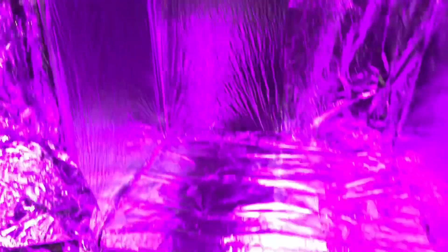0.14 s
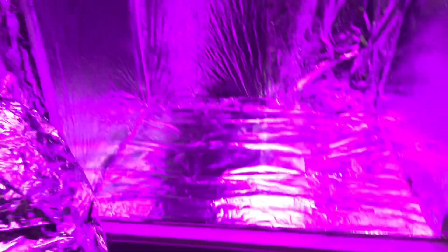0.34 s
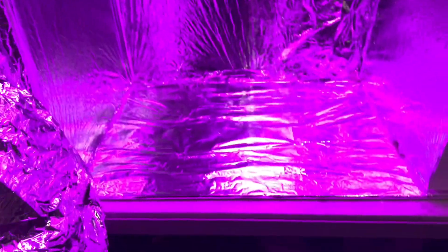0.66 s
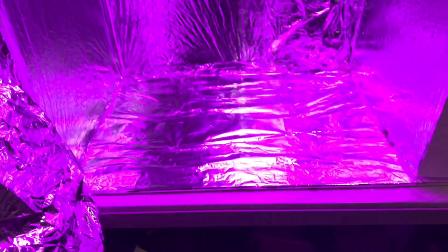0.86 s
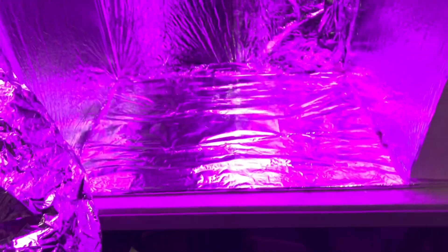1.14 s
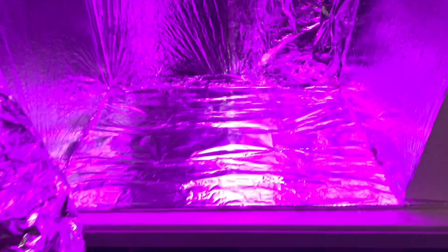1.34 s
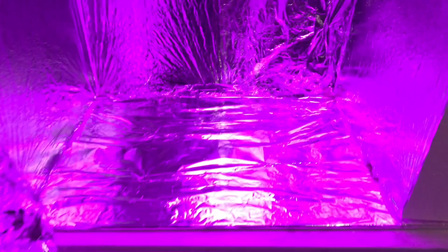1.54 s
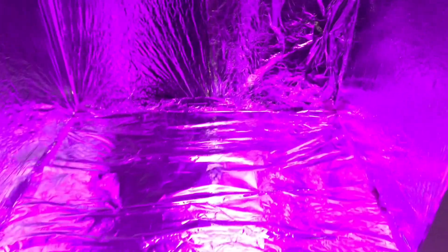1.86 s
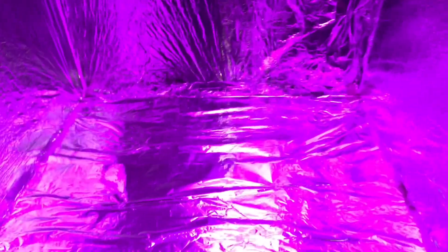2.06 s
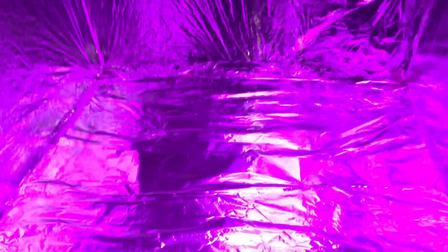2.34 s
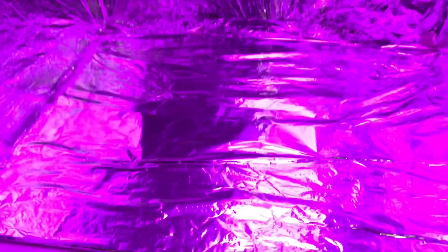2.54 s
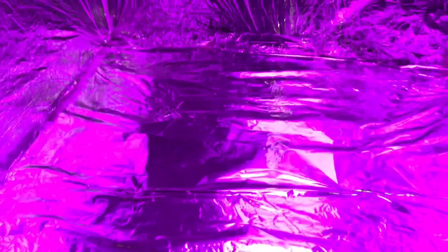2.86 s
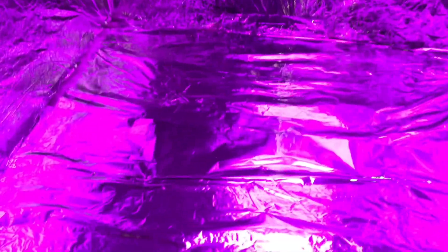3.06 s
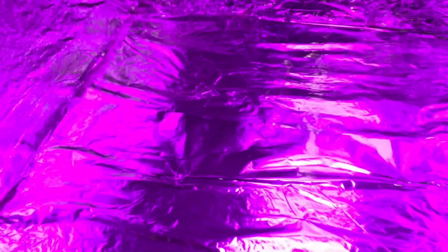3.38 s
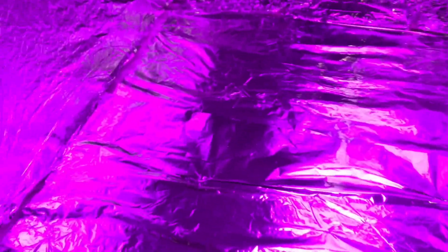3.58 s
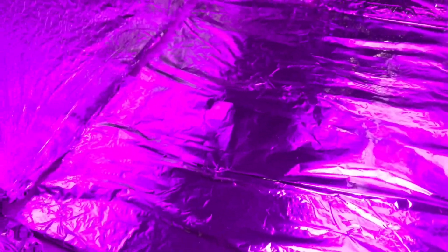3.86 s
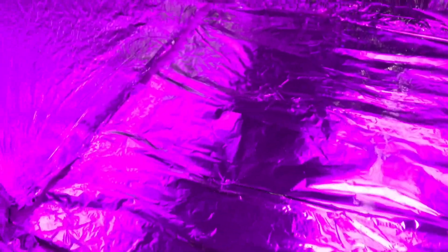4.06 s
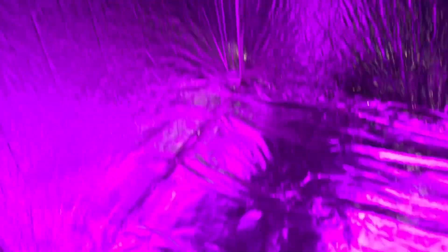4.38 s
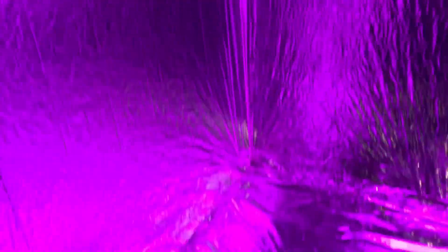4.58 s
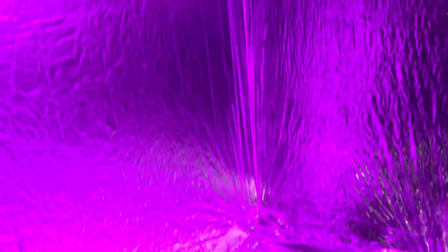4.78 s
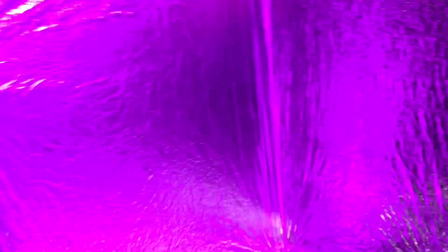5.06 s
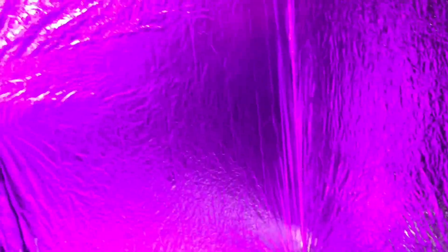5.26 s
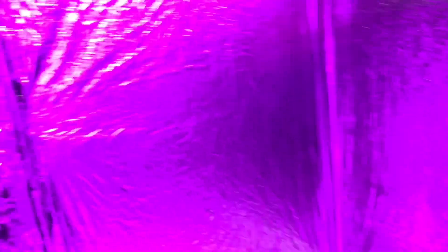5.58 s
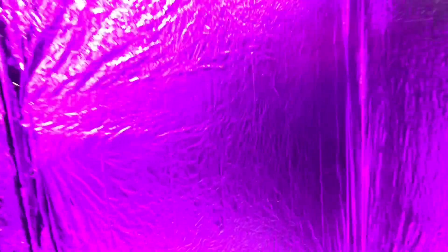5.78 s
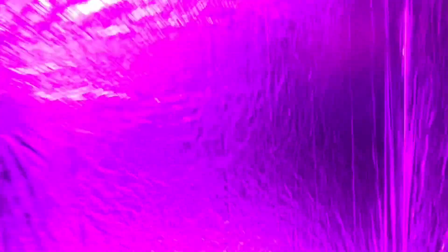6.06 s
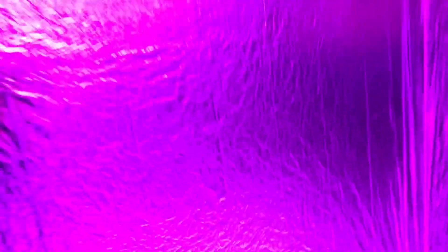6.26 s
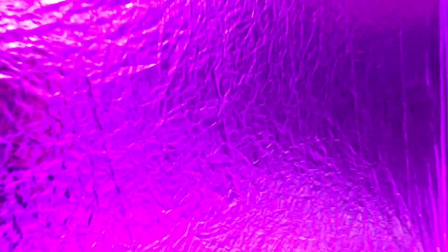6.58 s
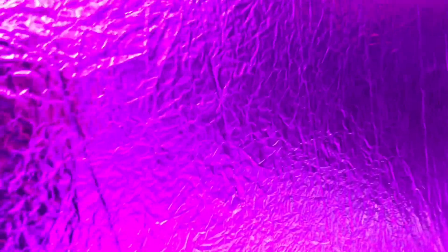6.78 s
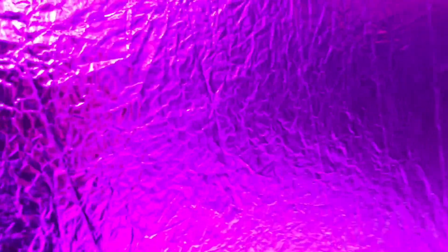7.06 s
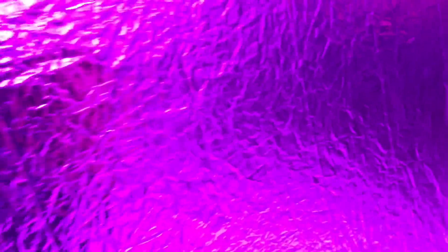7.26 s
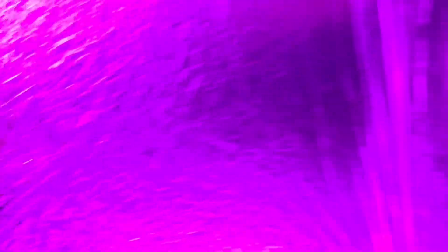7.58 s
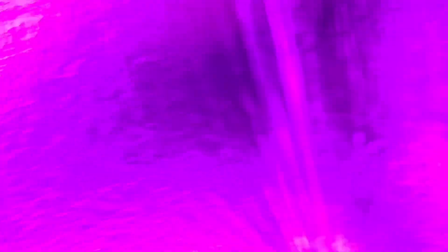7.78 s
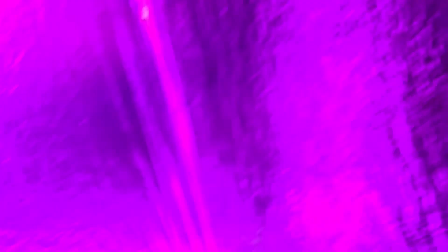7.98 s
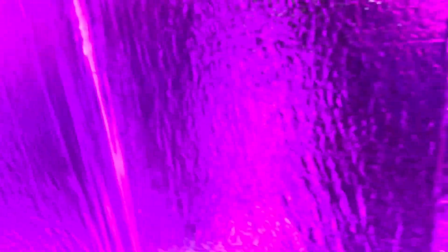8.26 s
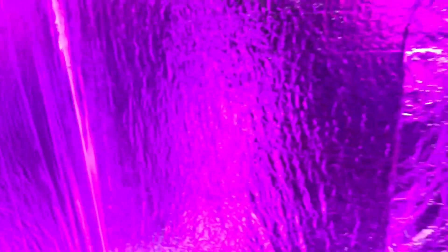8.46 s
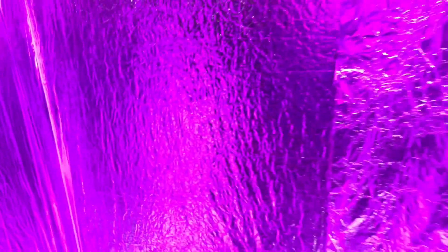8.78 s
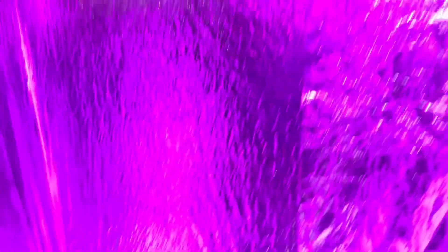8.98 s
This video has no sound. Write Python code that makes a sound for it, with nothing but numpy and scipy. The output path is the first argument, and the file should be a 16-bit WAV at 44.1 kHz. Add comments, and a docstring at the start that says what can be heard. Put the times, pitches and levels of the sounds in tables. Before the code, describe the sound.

Very close to the microphone, thin foil is pulled along the wall of a small box: dense, bright, uneven crackling with sharp snaps, strongest at the start and weakening until about three and a half seconds. Afterwards come isolated clicks, short scuffs and dull soft bumps, with quiet gaps of room air, a low fan hum and a thin electrical whine.

```python
"""Foil lining sliding in a small box

Close up, thin foil is pulled along the wall of a small box, then nudged now and again.
Uneven random clicks make the crinkle, short noise bursts the snaps, and resonated clicks the scuffs.
Short, changing echoes and panel resonances put the foil in the box; filtered noise makes handling rumble.
Beneath lie room air in coloured noise, a faint wavering fan tone and an electrical whine."""
import sys
import numpy as np
from scipy import signal
from scipy.fft import rfft, irfft
from scipy.io import wavfile
from scipy.ndimage import uniform_filter1d

SR = 44100
rng = np.random.default_rng(int(sys.argv[2]) if len(sys.argv) > 2 else 0)


def generate_wav(signal):
    """Clip the signal to [-1, 1] and save it as 16-bit WAV at the path in sys.argv[1]."""
    frames = np.transpose(np.atleast_2d(signal))
    scaled = np.clip(frames, -1, 1) * 32767
    pcm = np.round(scaled).astype(np.int16)
    wavfile.write(sys.argv[1], SR, pcm)


N = 402633
T = np.arange(N) / SR

# effort of the long pull, before the crinkle gain: t/s, level/dB
PULL_EFFORT = [(0.0, -38), (0.08, -38), (0.26, -43), (0.49, -40.5), (0.6, -46.5), (0.66, -43.5),
               (0.79, -51), (0.96, -53), (0.98, -46), (1.34, -42), (1.35, -44), (1.94, -47), (2.03, -54.5),
               (2.06, -48), (2.23, -49), (2.38, -44.5), (2.56, -52.0), (2.6, -50), (2.76, -51), (2.8, -55),
               (3.02, -49.5), (3.08, -59.5), (3.13, -56.2), (3.36, -61.5)]
# hand shaking the box, before the closing fade: t/s, level/dB
HAND_SHAKE = [(0.0, -73), (0.06, -50), (0.93, -68), (2.37, -69), (2.42, -59), (2.6, -72), (2.95, -66),
              (3.37, -81), (3.4, -65), (4.2, -81)]
# single large creases that snap: t/s, level/dB (loudest 5 ms, before the box), tilt/(dB per octave)
LARGE_SNAPS = [ (0.563, -37.5, 3), (0.634, -30, 4.5), (.7138, -38, 3), (.789, -34.5, .5), (.98, -30, 1.5),
               (1.084, -39.5, -0.5), (1.236, -36, 3), (1.5182, -37.5, -1), (1.8763, -45, 5),
               (2.0414, -41.5, 1.5), (2.6406, -41.5, 0), (2.68, -43, .5), (3.368, -45, -0.5),
               (3.4097, -42.5, -5.5), (3.4637, -40, -0.5), (3.5597, -38.5, -2.5), (3.819, -32, 0),
               (3.8765, -46, 3.5), (3.897, -52, 1), (3.9382, -48, -1.5), (3.96, -53, -4),
               (3.9758, -48.5, 0), (3.9905, -46, -1.5), (4.0577, -48.5, .5), (4.068, -53.5, -1.5),
               (4.3202, -55, 1), (4.707, -59.5, 4), (4.8625, -55.5, 1), (4.95, -52, 1), (5.218, -43, 0),
               (5.247, -46, 1.5), (5.286, -50, -1.5), (6.0135, -49, -1), (6.0256, -46, -1),
               (6.2205, -51, -1.5), (6.843, -48.5, -1), (7.17, -59.5, -4.5), (7.2666, -52.5, 1),
               (7.371, -58.5, -3), (7.437, -55, -0.5), (7.4848, -38.5, 0), (7.772, -58.5, -2),
               (8.1115, -42.5, 2.5), (8.358, -55, -0.5)]
# foil scuffing the wall: peak t/s, rise/s, panel level/dB, panel f/Hz, foil level/dB, foil top f/Hz
WALL_SCUFFS = [ (2.408, 0.024, -53, 1290, -34.5, 16000), (2.462, 0.045, -53, 1290, -40, 15000),
               (2.796, 0.0038, -36, 1170, -55, 9000), (2.824, 0.026, -35, 1610, -44, 12000),
               (2.875, .04, -42, 583, -64, 8000), (2.897, 0.04, -39, 1470, -39.5, 9400),
               (3.173, 0.024, -41.5, 1320, -42.5, 10700), (3.366, .007, -65, 1190, -49, 13000),
               (3.411, 0.0032, -41, 1820, -68, 12000), (3.461, 0.052, -56, 1530, -50, 15000),
               (3.553, 0.035, -69, 1500, -51.5, 14000), (3.655, 0.009, -56.5, 1470, -53, 14000),
               (3.712, 0.054, -58.5, 1320, -51.5, 11900), (3.82, .019, -53.5, 800, -47.5, 11000),
               (3.868, 0.022, -58, 1500, -54, 13000), (4.957, .012, -59.5, 1110, -51, 14000),
               (5.075, 0.058, -55, 1140, -45.5, 16700), (5.127, 0.039, -55, 1150, -46.5, 17000),
               (5.19, 0.038, -61, 990, -55, 16000), (5.291, 0.0092, -57.5, 900, -52.5, 16000),
               (6.041, 0.031, -52.5, 1910, -46.5, 7300), (6.353, 0.019, -57.5, 790, -57, 8100),
               (6.547, 0.047, -57, 2170, -56.5, 5240), (6.622, 0.032, -55, 2580, -53, 8500),
               (6.827, 0.022, -56, 1220, -56, 4200), (6.876, 0.05, -66, 990, -56, 14000),
               (7.485, 0.002, -44.5, 2510, -51, 12000), (7.945, 0.059, -59.5, 1500, -58.5, 6460),
               (7.983, 0.019, -51.5, 780, -58.5, 6460), (8.152, 0.044, -53.5, 980, -51, 9500),
               (8.184, 0.0076, -43.5, 2210, -64, 7000), (8.4, .016, -59, 1010, -58.5, 6100)]
# soft bumps against the box: t/s, level/dB, f/Hz
SOFT_BUMPS = [(3.416, -64, 225), (3.82, -67, 282), (5.09, -66, 109), (5.281, -66, 98), (6.348, -59, 86),
              (6.821, -56.5, 135), (6.834, -60, 52), (7.975, -75, 249), (8.13, -64.5, 160)]
# wall panel resonances: f/Hz, width/Hz, relative level/dB
PANEL_MODES = [(362, 55, -4), (549, 22, 1), (950, 50, -5), (1169, 40, -6), (1480, 70, -6), (1730, 50, -7),
               (1895, 32, -5), (2057, 34, -5), (2274, 38, -3), (3340, 40, -10)]
# low resonances of the whole box: f/Hz, width/Hz, relative level/dB
BOX_MODES = [(53.6, 12, -15), (70, 6.6, 5.5), (102, 15, -17), (135.4, 35, -4), (183, 110, -12),
             (350, 45, -13)]
# spectrum shape of creasing foil: f/Hz, relative level/dB
FOIL_SPECTRUM = [(100, -16), (400, -9), (900, -7), (1450, -2.5), (3400, 0.5), (4850, -2), (5700, 0),
                 (7700, -3.5), (8800, -0.5), (10300, -6), (11800, -1.5), (16000, -10)]
# spectrum shape of the rustling broad faces: f/Hz, relative level/dB
FACE_SPECTRUM = [(90, -25.5), (200, 2), (370, 2.5), (470, -6), (750, 2.5), (1200, 3.5), (2200, -4.5),
                 (5000, -26)]
# spectrum shape of foil grazing the wall or ticking: f/Hz, relative level/dB
GRAZE_SPECTRUM = [(100, -8.5), (400, -8.5), (1200, -5), (3400, 0.5), (4850, -2), (6300, 0), (7700, -5.5),
                  (9000, -0.5), (10300, -6), (12000, -1.5), (16000, -5.5)]
# spectrum shape of the room air: f/Hz, relative level/dB
AIR_SPECTRUM = [(15, -41), (25, -4), (102, -7.5), (185, -10.5), (384, -12), (489, -17.5), (988, -19),
                (1480, -20), (2050, -25.5), (2690, -22), (2990, -24), (4250, -25.5), (5880, -27),
                (16000, -30.5)]
# electrical whine, read between the rows for the other harmonics: harmonic number, rms level/dB
WHINE_HARMONICS = [(1, -88.5), (3, -87), (6, -90), (10, -99), (15, -91)]

AIR_DB, FAN_DB = -68, -80  # middle levels, about which both waver
FAN_HZ, WHINE_HZ = 101.5, 1002.2  # middle pitch of the fan; fundamental of the whine
TOP_HZ = 16200  # upper edge of the recorder's passband
PULL_DB, RELEASE_S = 0.64, 0.039  # crinkle gain; time in which the sheet comes to rest
# broad faces against the crinkle at a firm pull; they stand out more as the pull weakens (dB per dB)
FACES_DB, FIRM_PULL_DB, FACES_SLOPE = -11, -42, 0.26
# middling creases: level over the pull's effort, its scatter, decay time, tilt per octave
GIVE_DB, GIVE_SCATTER_DB, GIVE_DECAY_S, GIVE_TILT_DB = 0.5, 1.5, 0.0018, 3.5
# the harder the snap, the sooner it is over: decay at a reference level, and the dB that halve it
SNAP_DECAY_S, SNAP_REF_DB, SNAP_HALVING_DB = 0.0017, -46.5, 10
# a scuff dies away in a short time plus a share of its rise
SCUFF_DECAY_S, SCUFF_DECAY_SHARE = 0.011, 0.42
HANDLING_FADE_S, BUMP_DECAY_S = 0.5, 0.055


def undb(db):
    """Decibels to gain."""
    return 10 ** (np.asarray(db) / 20)


def unit(x):
    """Scale to rms 1."""
    return x / np.sqrt(np.mean(x ** 2))


def add(out, s, x):
    """Mix x into out from time s on."""
    i = max(int(s * SR), 0)
    out[i:i + len(x)] += x[:max(N - i, 0)]


def butter(x, order, hz, kind):
    """Butterworth filter of the given kind."""
    return signal.sosfilt(signal.butter(order, hz, kind, fs=SR, output="sos"), x)


def colour(x, points, size=4096):
    """Causal (minimum-phase) filter with the given spectrum shape, unit gain for white noise."""
    hz, db = np.transpose(points)
    f = np.maximum(np.fft.rfftfreq(size, 1 / SR), 1)
    shape_db = np.interp(np.log(f), np.log(hz), db)
    # folding the cepstrum forward in time makes the filter causal
    cepstrum = irfft(np.log(undb(shape_db)))
    cepstrum[1:size // 2] *= 2
    cepstrum[size // 2 + 1:] = 0
    response = irfft(np.exp(rfft(cepstrum)))
    return signal.fftconvolve(x, response / np.linalg.norm(response))[:len(x)]


def band(x, hz, width_hz):
    """One resonance, gain 1 at its centre."""
    b, a = signal.iirpeak(hz, hz / min(width_hz, SR / 4), fs=SR)
    return signal.lfilter(b, a, x)


def ring(x, modes):
    """A set of resonances driven together."""
    return sum(undb(db) * band(x, hz, width) for hz, width, db in modes)


def walk(rate):
    """Random wander of rms 1, with about `rate` new targets a second."""
    k = int(SR / rate)
    steps = np.repeat(rng.standard_normal(N // k + 1), k)
    return unit(uniform_filter1d(steps, k)[:N])


def buckles(rate, spread_db, clump_db, clump_rate):
    """Tiny random clicks of very uneven size, swelling together in little avalanches."""
    hit = rng.random(N) < rate / SR
    size = undb(spread_db * np.minimum(rng.exponential(size=N), 5))
    sign = rng.choice([-1, 1], N)
    return unit(hit * size * sign * undb(clump_db * walk(clump_rate)))


def enclosure(x, early_db=-3, early_s=0.0053, late_db=-7, late_s=0.028, panel_db=-3, size=512):
    """Foil scatters each click and the walls hold it a little; the sheet moves, so echoes keep changing."""
    t = T[:7 * size]
    onset = 1 - np.exp(-t / 0.00033)
    early = undb(early_db) * unit(np.exp(-t / early_s) * onset)
    late = undb(late_db) * unit(np.exp(-t / late_s) * onset)
    # every short piece of sound gets its own random echoes
    pieces = np.pad(x, (0, -N % size)).reshape(-1, size)
    echoes = np.hypot(early, late) * rng.standard_normal((len(pieces), len(t))) / np.sqrt(len(t))
    echoes[:, 0] = 1  # direct sound
    echoes /= np.linalg.norm(echoes, axis=1, keepdims=True)
    out = np.zeros(N)
    for k, piece in enumerate(signal.fftconvolve(pieces, echoes, axes=1)):
        add(out, (k * size + .5) / SR, piece)  # half a sample guards the rounding
    # the foil is fixed to the panels, which ring faintly with it
    return out + undb(panel_db) * ring(out, PANEL_MODES)


def room_air():
    """Soft coloured noise whose level drifts slightly."""
    return colour(rng.standard_normal(N), AIR_SPECTRUM) * undb(AIR_DB + 0.31 * walk(3.5))


def fan():
    """A low sine hum, wavering in pitch and level."""
    cycles = np.cumsum(FAN_HZ + 1.2 * walk(3)) / SR
    return unit(np.sin(2 * np.pi * cycles)) * undb(FAN_DB + 2 * walk(4))


def whine():
    """A thin, steady electrical tone: fifteen harmonics with random phases."""
    orders = np.arange(1, 16)
    gains = undb(np.interp(orders, *np.transpose(WHINE_HARMONICS)))
    return sum(g * np.sqrt(2) * np.sin(2 * np.pi * (k * WHINE_HZ * T + rng.random()))
               for k, g in zip(orders, gains))


def settling(level_db=-86):
    """The foil relaxes in sparse faint ticks throughout."""
    ticks = buckles(rate=12, spread_db=2, clump_db=1.5, clump_rate=3)
    return undb(level_db) * unit(band(colour(ticks, GRAZE_SPECTRUM), 2500, 7000))


def shaking():
    """The hand shakes the box with soft noise, and the box booms at its low resonances."""
    s, level_db = np.transpose(HAND_SHAKE)
    soft = butter(rng.standard_normal(N), 2, [40, 450], "band")
    fade = np.clip((s[-1] - T) / HANDLING_FADE_S, 0, 1)
    return undb(np.interp(T, s, level_db)) * fade * unit(ring(soft, BOX_MODES))


def bumps(width=0.55):
    """Soft bumps are dull thuds: noise through two resonances at one pitch, dying away."""
    out, t = np.zeros(N), T[:SR // 2]
    envelope = (1 - np.exp(-t / 0.0022)) * np.exp(-t / BUMP_DECAY_S)
    for s, level_db, hz in SOFT_BUMPS:
        push = rng.standard_normal(len(t))
        thud = band(band(push, hz, width * hz), hz, 2 * width * hz) * envelope
        add(out, s, thud * undb(level_db) / np.std(thud[:int(BUMP_DECAY_S * SR)]))
    return out


def scuffs(width=0.93, top_ratio=1.82, low_ratio=0.24):
    """Stick-slip clicks drive the panel around one pitch per scuff, and the foil hisses along."""
    out = np.zeros(N)
    slips = buckles(rate=8000, spread_db=1.8, clump_db=1.2, clump_rate=250)
    panel = slips + ring(slips, PANEL_MODES)
    creases = buckles(rate=11000, spread_db=2.7, clump_db=1.2, clump_rate=300)
    foil = colour(creases, GRAZE_SPECTRUM)
    for s, rise, panel_db, hz, foil_db, top_hz in WALL_SCUFFS:
        decay = SCUFF_DECAY_S + SCUFF_DECAY_SHARE * rise
        span = slice(int((s - rise) * SR), int((s + 7 * decay) * SR))
        t = T[span] - s
        pressure = np.clip(1 + t / rise, 0, 1) * np.exp(-np.maximum(t, 0) / decay)
        resonated = band(panel[span], hz, width * hz)
        wall = unit(butter(resonated, 4, [low_ratio * hz, top_ratio * hz], "band"))
        hiss = unit(butter(foil[span], 2, min(top_hz, .45 * SR), "low"))
        out[span] += pressure * (undb(panel_db) * wall + undb(foil_db) * hiss)
    return out


def effort(s):
    """Effort of the pull in dB at the times s."""
    return np.interp(s, *np.transpose(PULL_EFFORT))


def giving_creases(count=26):
    """Middling creases at random moments of the pull, following its effort: rows as in large_creases."""
    moments = PULL_EFFORT[-1][0] * rng.random(count)
    levels = effort(moments) + GIVE_DB + GIVE_SCATTER_DB * rng.standard_normal(count)
    return [(s, level_db, GIVE_DECAY_S, GIVE_TILT_DB) for s, level_db in zip(moments, levels)]


def large_creases():
    """Large creases, shorter when harder: rows of t/s, level/dB, decay/s, tilt/(dB per octave)."""
    return [(s, level_db, SNAP_DECAY_S * 2 ** ((SNAP_REF_DB - level_db) / SNAP_HALVING_DB), tilt_db)
            for s, level_db, tilt_db in LARGE_SNAPS]


def snaps(flat_hz=4000, run_up=0.83, lead_s=.012, flip=6.1, edge_hz=320, edge_octaves=0.75):
    """A crease flips amid a quick noisy run of smaller ones; the brighter its tilt, the fewer its lows."""
    out, t = np.zeros(N), T[:SR // 10] - lead_s
    hz, db = np.transpose(FOIL_SPECTRUM)
    for s, level_db, decay, tilt_db in large_creases() + giving_creases():
        envelope = np.exp(np.minimum(t / (run_up * decay), -t / decay))
        run = rng.standard_normal(len(t)) * envelope
        # the flip itself is one sharp pulse, which stands out most in a short run
        run[np.searchsorted(t, 0)] += flip
        tilted_db = db + tilt_db * np.log2(hz / flat_hz)
        low_edge_hz = min(edge_hz * 2 ** (edge_octaves * tilt_db), flat_hz)
        snap = butter(colour(run, np.transpose([hz, tilted_db])), 2, low_edge_hz, "high")
        loudest = np.sqrt(uniform_filter1d(snap ** 2, SR // 200).max())  # rms over 5 ms
        add(out, s - lead_s, snap * undb(level_db) / loudest)
    return out


def pull():
    """The sliding sheet: small creases crackle while its broad faces rustle lower down."""
    level_db = effort(T)
    rest = np.clip((PULL_EFFORT[-1][0] - T) / RELEASE_S, 0, 1)
    flutter = undb(0.51 * walk(55))
    clicks = buckles(rate=12000, spread_db=3.5, clump_db=2.5, clump_rate=320)
    creases = colour(clicks, FOIL_SPECTRUM)
    rustle = buckles(rate=8000, spread_db=1.9, clump_db=0, clump_rate=110)
    faces = colour(rustle, FACE_SPECTRUM)
    faces_gain = undb(FACES_DB + FACES_SLOPE * (FIRM_PULL_DB - level_db))
    return undb(PULL_DB + level_db) * rest * flutter * (creases + faces_gain * faces)


def scene():
    """Foil sounds pass through the box; handling and background join them directly."""
    background = room_air() + fan() + whine()
    handling = shaking() + bumps()
    foil = settling() + scuffs() + snaps() + pull()
    return (background + handling + enclosure(foil))[None]


def record(dry):
    """The recorder cuts the deepest bass and the top."""
    dry = butter(dry, 4, 36, "high")
    return signal.sosfilt(signal.ellip(10, .2, 70, TOP_HZ, fs=SR, output="sos"), dry)


dry = scene()
out = record(dry)
generate_wav(out)
```